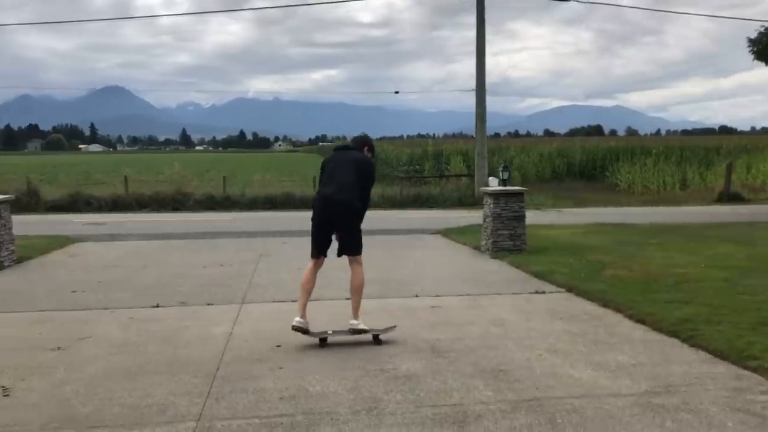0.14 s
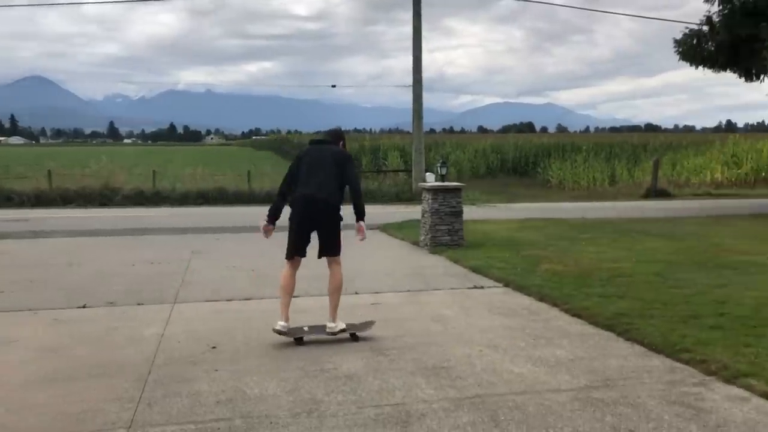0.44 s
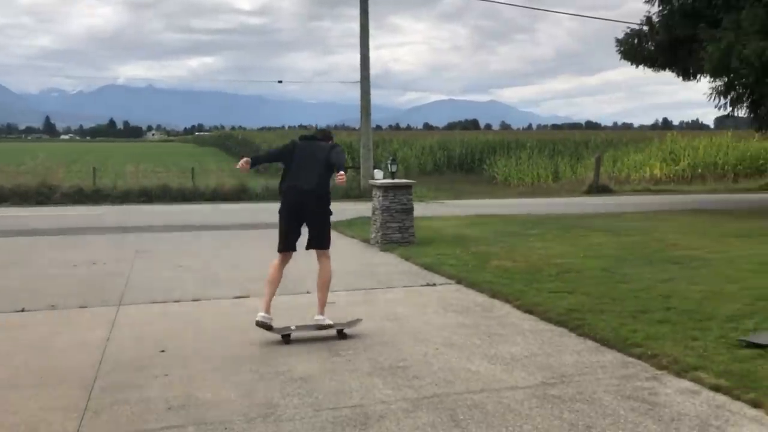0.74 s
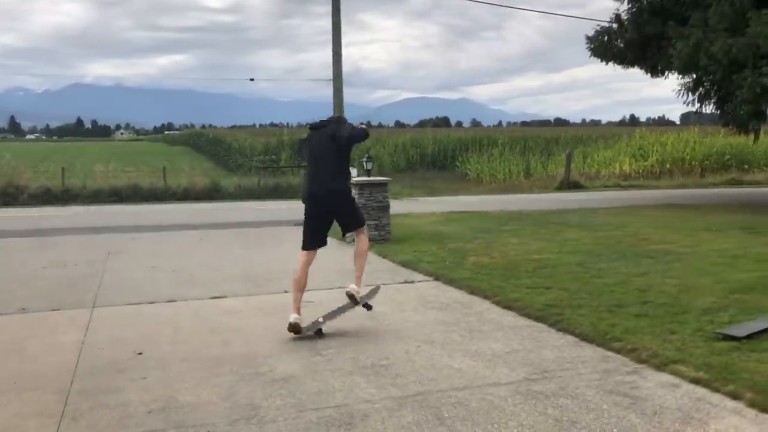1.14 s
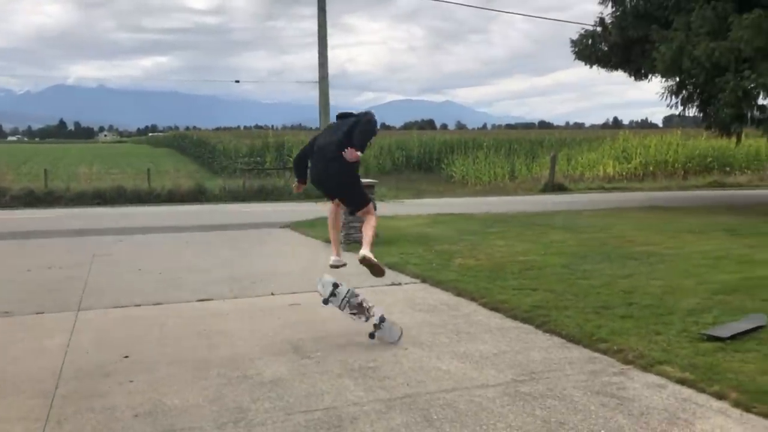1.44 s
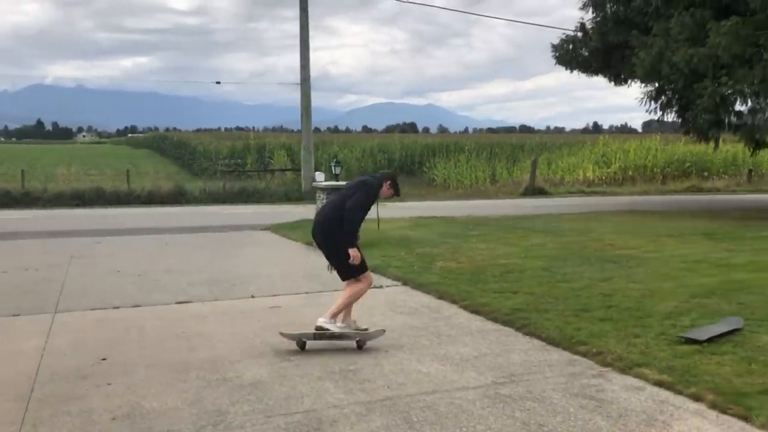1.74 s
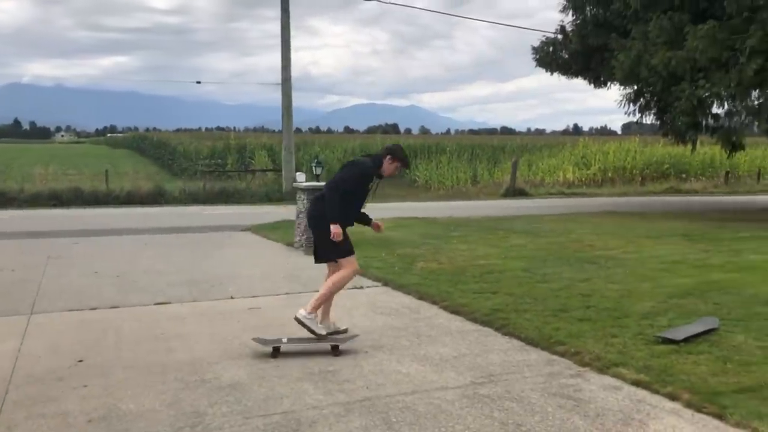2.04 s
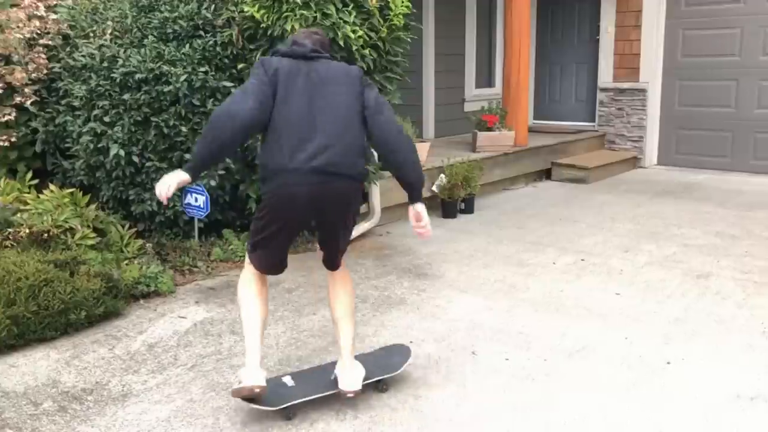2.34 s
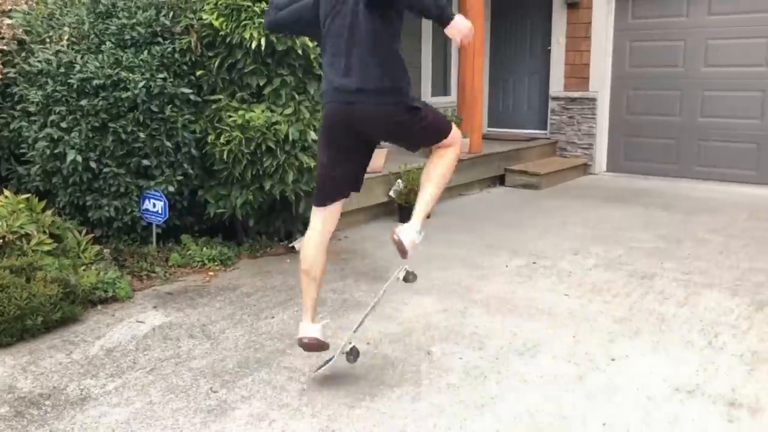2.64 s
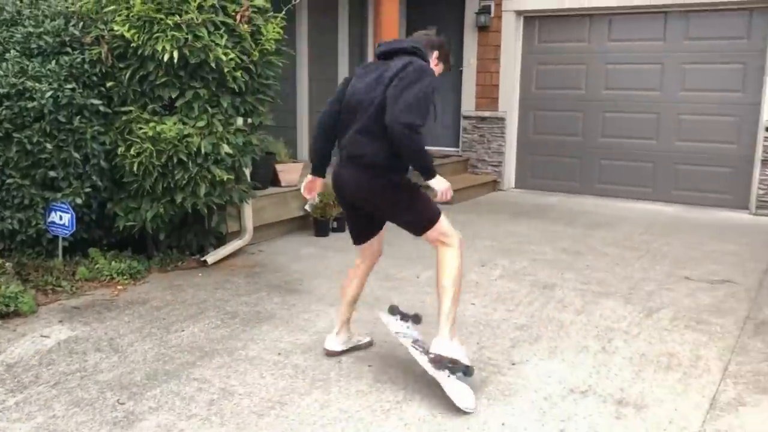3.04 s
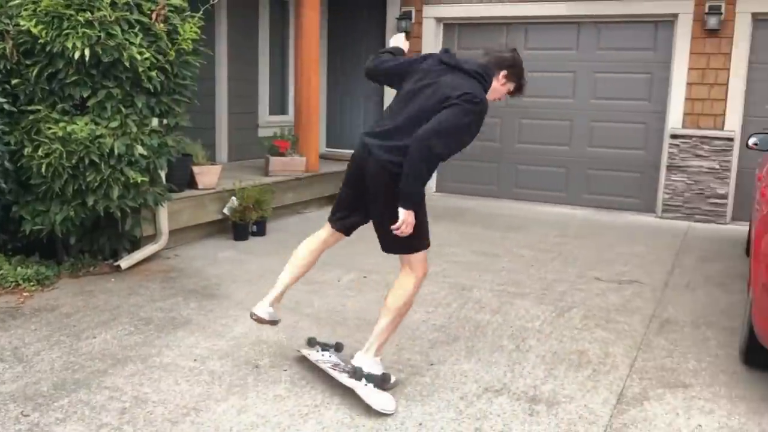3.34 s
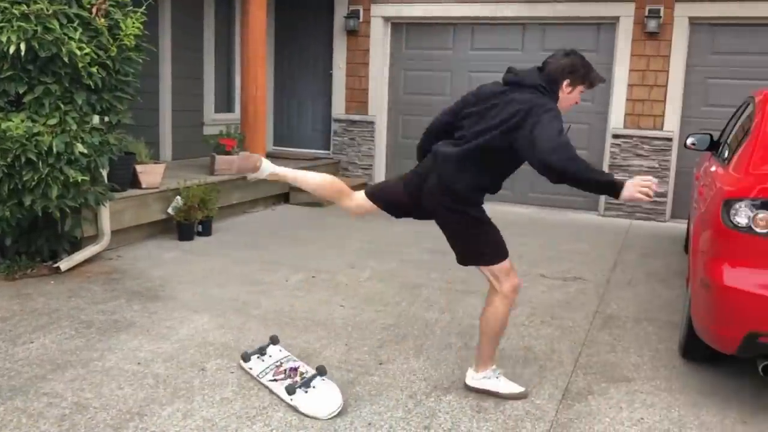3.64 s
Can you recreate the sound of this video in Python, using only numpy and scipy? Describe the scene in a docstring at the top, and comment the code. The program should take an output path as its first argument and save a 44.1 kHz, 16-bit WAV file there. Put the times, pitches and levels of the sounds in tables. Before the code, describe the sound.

Two skateboard tricks sound on outdoor concrete. The first is farther off, with a low wheel rumble, a pop and a clattering landing. The second is close: a louder roll, a snap, scuffing shoes and the board clattering and scraping to a stop.

```python
"""A concrete driveway in quiet outdoor air, one microphone, two skateboard tricks. First, out in the
open, the board rolls, its tail is popped, it clatters down and the rider lands on it. From 2.32 s,
closer and beside a house: a fast roll, a pop and a flick, then the board crashes, tumbles and scrapes
to rest. The wheels rumble on the rough surface and the shoes rasp. Each blow is a woody knock with
a gritty crunch that sets the deck ringing; the yard answers."""
import sys
import numpy as np
from scipy import signal
from scipy.io import wavfile

SR = 44100
rng = np.random.default_rng(int(sys.argv[2]) if len(sys.argv) > 2 else 0)


def materialize(psi):
    """Save the field psi as 16-bit PCM at rate SR to the path in sys.argv[1].

    A 1-D psi becomes a single channel; in a 2-D psi each row is a channel.
    """
    bounded = np.clip(np.atleast_2d(psi).T, -1, 1)
    quanta = np.round(bounded * 32767).astype(np.int16)
    wavfile.write(sys.argv[1], SR, quanta)


N = 167580
TIME = np.arange(N) / SR
NEAR_FROM_S = 2.322  # from here the microphone is close to the board, beside the house
CONTACT_RISE_S = 0.00012


def from_db(db):
    return 10 ** (np.asarray(db) / 20)


def rms_one(x):
    return x / np.sqrt(np.mean(x ** 2) + 1e-20)


def energy_one(x):
    return x / np.sqrt(np.sum(x ** 2) + 1e-20)


def level(curve):
    """Gain along a curve of (s, dB)."""
    return from_db(np.interp(TIME, *np.transpose(curve)))


def swell(s, length_s, db):
    """A bell-shaped gain that peaks at time s."""
    return from_db(db) * np.exp(-((TIME - s) / length_s) ** 2)


def at_hz(points, hz, column=1):
    """Read a column of a spectrum table."""
    points = np.array(points)
    return np.interp(np.log(hz), np.log(points[:, 0]), points[:, column])


def band(x, low, high, order=2):
    """Causal band-pass."""
    return signal.sosfilt(signal.butter(order, [low, high], "band", fs=SR, output="sos"), x + 1e-18)


def resonate(x, hz, width_hz):
    """A resonance with gain 1 at its peak."""
    r = np.exp(-np.pi * width_hz / SR)
    feedback = [1, -2 * r * np.cos(2 * np.pi * hz / SR), r * r]
    return signal.lfilter(np.array([1, 0, -1]) * (1 - r * r) / 2, feedback, x + 1e-18)


def drift(rate_hz):
    """A smooth random wander of rms 1."""
    r = np.exp(-2 * np.pi * rate_hz / SR)
    return rms_one(signal.lfilter([1], [1, -2 * r, r * r], rng.standard_normal(N + SR))[SR:])


def bands(sources):
    """Half-octave bands taken in turn from two sources: (centre Hz, sound)."""
    edges = 35 * 2 ** np.arange(0, 9.1, .5)
    return [(np.sqrt(low * high), band(sources[k % 2], low, high, order=3))
            for k, (low, high) in enumerate(zip(edges, edges[1:]))]


def coloured(sources, colour):
    """Shape two excitations by a spectrum; rms 1."""
    return rms_one(sum(from_db(at_hz(colour, hz)) * x for hz, x in bands(sources)))


def grains(per_s, spread_db):
    """Tiny random impacts of uneven size, in two unrelated polarities."""
    sizes = from_db(spread_db * np.minimum(rng.exponential(1, N), 4))
    return sizes * (rng.random(N) < per_s / SR) * rng.choice([-1, 1], (2, N))


def add(out, s, sound):
    """Mix a sound in at time s."""
    i = int(s * SR)
    out[i:i + len(sound)] += sound[:N - i]


def at_level(x, db):
    """Scale a short sound to a level taken over 12 ms."""
    return from_db(db) * np.sqrt(.012 * SR) * energy_one(x)


def crunch(length_s):
    """A contact: a few milliseconds of crushing grit."""
    t = TIME[:SR // 10]
    envelope = (1 - np.exp(-t / CONTACT_RISE_S)) * np.exp(-(t / length_s) ** 1.44)
    return envelope * rng.choice([-1, 1], len(t))


# The air over the driveway. Each row: frequency in Hz, relative level in dB.
AIR_COLOUR = [(24, -44), (40, -2.5), (98, -11.5), (291, -14.5), (627, -2), (845, 12), (1230, -0.5),
              (5160, -20), (15000, -17.5)]


def outdoor_air():
    """A faint, steady hush all around the microphone."""
    return from_db(-64.5) * coloured(rng.standard_normal((2, N)), AIR_COLOUR)


# The yard's echo. Each row: frequency in Hz, gain in dB in the open, gain in dB by the house,
# seconds to fall 60 dB.
YARD = [(120, 1, -20, 0.21), (350, -15, -17.5, 0.34), (800, -14, -7.5, 0.37), (1790, -14, -21, 0.65),
        (5000, -13, -14.5, 0.44), (7500, -15.5, -5, 0.18), (13900, -33.5, -11.5, .25)]
IN_OPEN, BY_HOUSE, T60 = 1, 2, 3  # its columns


def yard(x, place):
    """Quick scatter from nearby surfaces, then a tail that dies by band, its treble blurred to hiss."""
    t, tail, hiss = TIME[:SR], 0, 0
    delay_s, scatter_s = 0.0098, 0.015
    onset = 1 - np.exp(-t / delay_s)
    for (hz, noise), (_, part) in zip(bands(rng.standard_normal((2, N))), bands([x, x])):
        decay = from_db(-60 * t / at_hz(YARD, hz, T60))
        fade = from_db(at_hz(YARD, hz, place)) * energy_one(onset * decay)
        if hz < 2400:
            tail += noise[:SR] * fade
        else:
            power = np.abs(signal.fftconvolve(part ** 2, fade ** 2)[:N])
            hiss += rms_one(noise) * np.sqrt(power)
    scatter = energy_one(rng.standard_normal(SR) * np.exp(-t / scatter_s) * (t > delay_s))
    return signal.fftconvolve(x, tail + from_db(-16) * scatter)[:N] + hiss


# Shoes sliding. Each row: peak time in seconds, half-length in seconds, level in dB.
SCUFFS = [(0.454, 0.023, -50.5), (1.168, 0.016, -46), (1.98, 0.019, -39), (1.249, 0.046, -40.5),
          (1.334, 0.022, -45), (1.61, 0.066, -30), (2.255, 0.063, -49), (2.674, 0.062, -34.5),
          (2.789, 0.011, -39.5), (3.442, 0.092, -55.5), (3.602, 0.034, -58), (3.79, 0.026, -55.5)]
# Their rasp. Each row: frequency in Hz, relative level in dB.
SCUFF_COLOUR = [(150, -1.5), (600, 1.5), (1300, 1.5), (2300, -1.5), (4500, -16), (7500, -9), (15000, -18.5)]


def scuffs():
    """Soles rasp on grip tape and concrete in short swells."""
    force = sum(swell(*scuff) for scuff in SCUFFS)
    return force * coloured(grains(per_s=5000, spread_db=4.5), SCUFF_COLOUR)


def sand_cracks():
    """Single grains of sand burst under the wheels, each a tiny puff of noise."""
    burst_s = 0.00074
    hits = np.abs(grains(per_s=180, spread_db=3.3)[0])
    bursts = signal.lfilter([1], [1, -np.exp(-1 / (burst_s * SR))], hits + 1e-18)
    return rms_one(band(bursts * rng.standard_normal(N), 3300, 14000))


# The hum of the farther roll. Each row: time in seconds, pitch in Hz, relative level in dB.
HUM = [(0, 628.4, 2), (.15, 660, 4.5), (0.272, 624, 0), (.52, 644, -1.5), (0.729, 594, 0.5),
       (0.872, 625, 5.5), (.96, 705, 7), (1.049, 658, -5.5), (1.7, 640, 3), (2.3, 640, -28)]


def wheel_hum():
    """Each of four wheels hums with its own waver and flutter around a shared pitch."""
    s, pitch_hz, db = np.transpose(HUM)
    wheels = 0
    for _ in range(4):
        flutter = 1 + .45 * drift(rate_hz=120)
        pitch = np.interp(TIME, s, pitch_hz) * (1 + .04 * drift(rate_hz=30.54))
        wheels += flutter * np.sin(2 * np.pi * np.cumsum(pitch) / SR)
    return from_db(np.interp(TIME, s, db) - 8) * rms_one(wheels)


# Wheel pressure on the concrete, heard from farther off. Each row: time in seconds, level in dB.
FAR_ROLL = [(0, -49), (.5, -48), (.84, -54.5), (.94, -49), (1.04, -37), (1.11, -47), (1.2, -61), (1.3, -62),
            (1.72, -41), (1.9, -52), (2.1, -55.5), (2.31, -49.5)]
# The rumble at that distance. Each row: frequency in Hz, relative level in dB.
FAR_COLOUR = [(40, -36.5), (75, 2.5), (150, 3.5), (250, 0), (460, -9.5), (640, -12), (850, -12),
              (1500, -15), (2100, -13.5), (2800, -28), (4000, -22), (5200, -32.5), (6500, -26),
              (15000, -37.5)]


def far_wheels():
    """Out in the open the wheels rumble over the rough surface, hum and crack grains of sand."""
    pressure = level(FAR_ROLL)
    rumble = coloured(grains(per_s=6600, spread_db=2), FAR_COLOUR)
    rumble *= from_db(-2.5 + drift(rate_hz=33))
    sand_gain = from_db(-64) * rms_one(pressure) ** 0.42  # follows the pressure loosely
    return pressure * (rumble + wheel_hum()) + sand_gain * sand_cracks()


# The fast roll close to the microphone. Each row: time in seconds, level in dB.
NEAR_ROLL = [(2.32, -37), (2.4, -35.5), (2.46, -31.5), (2.52, -36), (2.57, -39), (2.625, -35.5),
             (2.67, -37), (2.8, -52), (2.92, -47.5), (2.96, -48.5), (3.1, -64.5)]
# The rumble up close. Each row: frequency in Hz, relative level in dB.
NEAR_COLOUR = [(24, -63), (40, -32), (200, -1), (321, -5), (401, 0), (746, -8), (866, -11), (1110, -5.5),
               (2170, -14.5), (5290, -26), (15000, -26.5)]


def near_wheels():
    """Beside the house the wheels rumble over the concrete with a coarser grain."""
    return level(NEAR_ROLL) * coloured(grains(per_s=2600, spread_db=2.5), NEAR_COLOUR)


# Wheels under load. Each row: peak time in seconds, half-length in seconds, centre in Hz, level in dB.
GROWLS = [(1.054, 0.021, 254, -42.5), (2.467, 0.055, 205, -33), (2.63, 0.021, 287, -35.5)]


def growls():
    """Under the crouching rider the rumble swells in a low resonance."""
    return sum(swell(s, length_s, db) * rms_one(band(rng.standard_normal(N), hz - 48, hz + 48))
               for s, length_s, hz, db in GROWLS)


# Light contacts. Each row: start in seconds, level in dB, centre in Hz.
TAPS = [(.197, -69, 7000), (0.233, -58, 8000), (0.464, -55, 6040), (.618, -54.5, 3650), (.878, -57, 7750),
        (0.966, -56.5, 4830), (1.619, -38.5, 4500), (2.134, -56, 7900), (2.156, -56, 8200),
        (2.195, -59.5, 6400), (2.32, -55, 2000), (2.586, -38.5, 1384), (3.07, -30, 3200),
        (3.242, -36, 3210), (3.378, -50, 3270), (3.405, -44, 2980), (3.573, -53, 2820)]


def taps():
    """Grit, shoes and hardware tap lightly: a pitched rasp with a fine tick on top."""
    out = np.zeros(N)
    for s, db, hz in TAPS:
        rasp = band(crunch(length_s=0.0063), hz / 1.31, hz * 1.31)
        tick = band(crunch(length_s=0.0023), 5500, 17000)
        add(out, s, at_level(rasp, db) + at_level(tick, db - 8))
    return out


# Brief squeaks. Each row: peak time, swell and fade in seconds, pitch at the peak in Hz,
# fall in Hz per second, level in dB.
SQUEAKS = [(1.159, 0.0087, .008, 3560, 71000, -44.5), (2.82, .008, .008, 5970, 3, -51),
           (3.136, 0.0066, 0.0032, 3032, 3957, -16), (3.1386, 0.0024, .0026, 2650, 129800, -12.5)]


def squeaks():
    """Rubber and the deck's edge stick and slip: rough tones that swell, glide and stop."""
    out = np.zeros(N)
    for s, swell_s, fade_s, hz, fall, db in SQUEAKS:
        t = TIME - s
        glide = np.clip(hz - fall * t, hz / 2, hz * 2)
        pitch = glide * (1 + .055 * drift(rate_hz=500))
        envelope = from_db(db) * np.exp(-np.maximum(-t / swell_s, t / fade_s))
        out += envelope * np.sqrt(2) * np.sin(2 * np.pi * np.cumsum(pitch) / SR)
    return out


# The board rattling and dragging on the driveway. Each row: time in seconds, level in dB.
RATTLE = [(1.49, -69), (1.505, -18.5), (1.54, -50), (1.62, -40), (1.65, -40), (1.7, -30), (1.74, -82),
          (2.9, -72), (2.948, -37), (2.97, -16.5), (3.0, -21.5), (3.07, -21.5), (3.12, -24.5), (3.15, -42),
          (3.18, -26.5), (3.22, -35.5), (3.3, -64.5), (3.4, -82.5)]
# Its tone at the microphone. Each row: frequency in Hz, relative level in dB.
RATTLE_COLOUR = [(40, -20.5), (80, 2.5), (160, -3.5), (300, 1), (600, 5), (950, 0), (1300, 0), (2300, -2),
                 (3300, -9.5), (5000, -24), (9000, -21.5), (15000, -33.5)]


def rattle():
    """Dense small knocks as the board chatters along the ground."""
    return level(RATTLE) * coloured(grains(per_s=810, spread_db=1.5), RATTLE_COLOUR)


# Modes of deck and trucks. Each row: frequency in Hz, relative level in dB, seconds to fall 60 dB.
DECK_MODES = [(325, -9.5, 0.11), (453.6, -2, 0.069), (676.5, -5.5, 0.097), (850, -2.5, .05),
              (920, -2.5, 0.048), (1053, 5, 0.03), (1139, -6, 0.096), (1399, -6, .07), (1608, -7.5, 0.083),
              (1946, -1, 0.053), (2220, -1, 0.034), (2560, -4, 0.023), (3040, -9.5, 0.023),
              (4080, -1.5, .025)]


def deck_ring(favoured_hz):
    """The deck and trucks ring freely; the spot that is struck favours the modes near one pitch."""
    t, modes = TIME[:SR // 10], 0
    boost_db, reach_octaves = 9.5, 0.17
    for k, (hz, db, t60) in enumerate(DECK_MODES):
        favour_db = boost_db * np.exp(-(np.log2(hz / favoured_hz) / reach_octaves) ** 2)
        modes += (-1) ** k * from_db(db + favour_db - 60 * t / t60) * np.sin(2 * np.pi * hz * t)
    return modes * (1 - np.exp(-t / CONTACT_RISE_S))


# Blows on the board, the foreground of both tricks. Each row: start in seconds, levels in dB of thump,
# knock, clack, crack, grit and ring, clack centre in Hz, contact length in seconds, knock pitch in Hz,
# favoured mode in Hz.
BLOWS = [(1.2176, -58, -51.5, -28.5, -34, -38, -26.5, 2390, 0.0049, 691, 1468),
         (1.4963, -26.5, -13, -21, -34.5, -27, -26, 1313, 0.0041, 619, 1550),
         (1.5505, -27.5, -33, -29, -40, -39, -30.5, 2380, 0.0088, 580, 2210),
         (1.558, -27.5, -31, -28, -46, -48, -25.5, 2260, 0.0027, 590, 450),
         (1.587, -32, -26.5, -28, -37, -36, -24.5, 2020, .0045, 720, 2900),
         (1.61, -28, -32, -48, -57, -36.5, -24.5, 1700, 0.0063, 544, 450),
         (1.6567, -14, -13.5, -19, -22.5, -16.5, -16, 1760, .0022, 586, 439),
         (1.674, -28, -26, -28.5, -52, -42, -52, 2000, .005, 660, 2250),
         (1.6938, -29, -33, -31, -36, -47, -29.5, 1800, 0.0075, 602, 325),
         (1.961, -39, -37, -34, -47.5, -36.5, -36.5, 1184, 0.01, 630, 677),
         (2.221, -44.5, -46.5, -44.5, -52, -45, -54, 1300, 0.0068, 575, 1090),
         (2.276, -42, -41.5, -41.5, -66, -59, -41.5, 1550, 0.0035, 694, 1110),
         (2.617, -43.5, -40, -40, -44, -41, -35, 1303, 0.012, 708, 2236),
         (2.639, -32.5, -32, -15, -21.5, -31.5, -18.5, 2260, 0.0082, 562, 1095),
         (2.6714, -48, -27.5, -17, -31.5, -36.5, -19.5, 2010, 0.013, 1050, 1940),
         (2.956, -23.5, -10, -21, -28, -23, -17, 984, 0.0035, 608, 2250),
         (2.9885, -23, -15.5, -20.5, -32, -28, -20.5, 1495, 0.013, 608, 445),
         (3.001, -32, -22, -25, -34.5, -38.5, -23, 2020, 0.0059, 699, 1136),
         (3.0221, -26, -14, -17.5, -28, -28, -15.5, 2126, 0.0027, 685, 450),
         (3.038, -23.5, -27, -26, -36, -31, -22.5, 1930, .012, 672, 1135),
         (3.0551, -34, -15.5, -18, -43, -32.5, -20.5, 937, 0.016, 715, 1617),
         (3.138, -31, -23.5, -13.5, -33.5, -44, -24.5, 2320, 0.0027, 650, 2245),
         (3.167, -37.5, -27.5, -21.5, -31, -35.5, -33.5, 1810, 0.012, 634, 1930),
         (3.6498, -48, -45, -46.5, -73.5, -68.5, -53, 1400, 0.0016, 568, 1600)]


def blows():
    """Each blow flexes the wood, crunches on the concrete and leaves the deck ringing."""
    out, push = np.zeros(N), signal.unit_impulse(SR // 10)
    for (s, thump_db, knock_db, clack_db, crack_db, grit_db, ring_db,
         clack_hz, contact_s, knock_hz, favoured_hz) in BLOWS:
        flexes = [(112, 100, thump_db - 20.5),  # the rider's weight under the thump
                  (248, 218, thump_db), (knock_hz, 290, knock_db)]
        for hz, width_hz, db in flexes:
            flex = resonate(resonate(push, hz, width_hz), hz, width_hz)
            add(out, s, at_level(flex, db))
        clack = band(crunch(contact_s), 970, 2450)
        clack += from_db(7.5) * resonate(clack, clack_hz, width_hz=310)
        crack = band(crunch(contact_s), 2620, 4170)
        grit = band(crunch(contact_s), 5370, 12400)
        add(out, s, at_level(clack, clack_db) + at_level(crack, crack_db) + at_level(grit, grit_db))
        add(out, s, at_level(deck_ring(favoured_hz), ring_db))
    return out


def scene():
    """Board, wheels and shoes in the open and then close by the house, over quiet outdoor air."""
    board = blows() + rattle() + taps()
    squeal = squeaks()
    to_yard = board + from_db(-13.5) * squeal
    near = TIME > NEAR_FROM_S
    echoes = yard(to_yard * ~near, IN_OPEN) + yard(to_yard * near, BY_HOUSE)
    air = outdoor_air()
    closeness = .5 + .5 * np.tanh((TIME - NEAR_FROM_S) / 0.0091)  # a quick crossfade
    wheels = (1 - closeness) * far_wheels() + closeness * near_wheels() + growls()
    return (air + echoes + scuffs() + wheels + squeal + board)[None]


def record(dry):
    """At the microphone the loudest peaks are rounded; below 25 Hz and above 16 kHz is cut."""
    rounded = dry / (1 + dry ** 4) ** .25
    low_cut = signal.sosfilt(signal.butter(1, 25, "high", fs=SR, output="sos"), rounded)
    return signal.sosfilt(signal.ellip(10, .1, 70, 16000, fs=SR, output="sos"), low_cut)


dry = scene()
out = record(dry)
materialize(out)
```